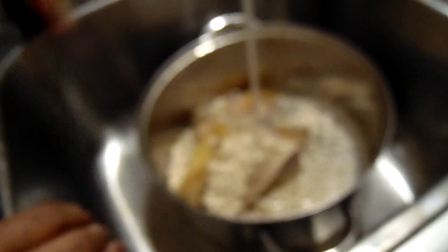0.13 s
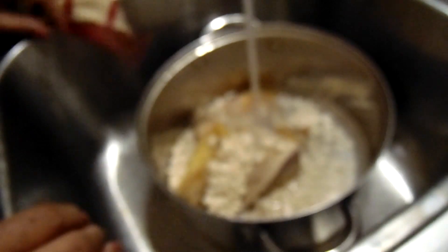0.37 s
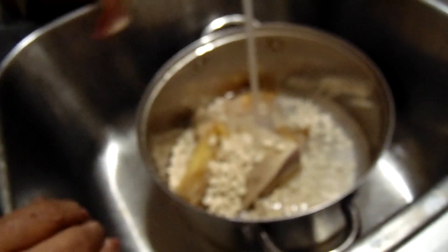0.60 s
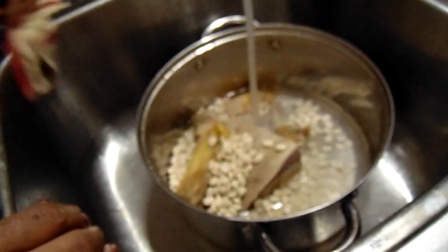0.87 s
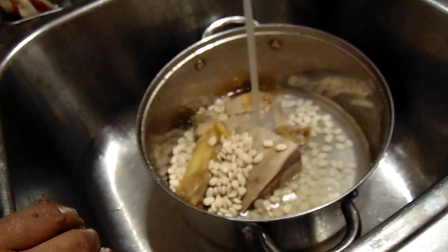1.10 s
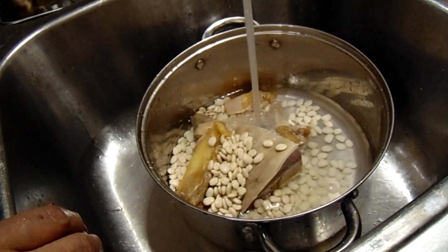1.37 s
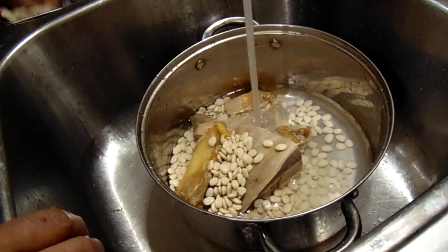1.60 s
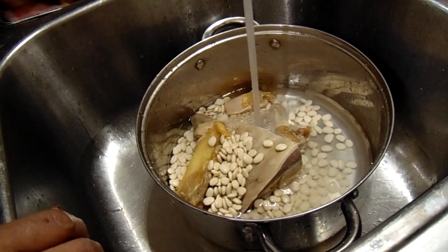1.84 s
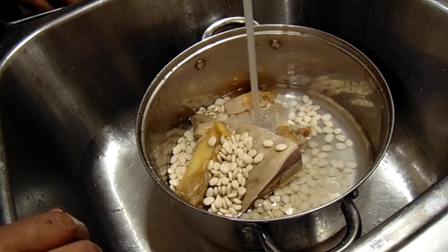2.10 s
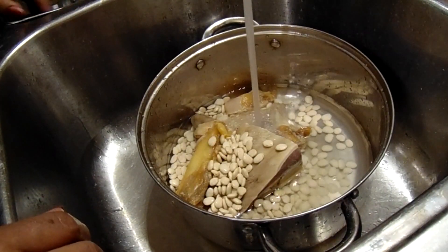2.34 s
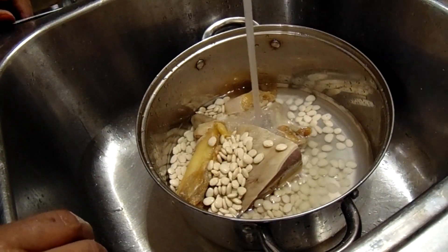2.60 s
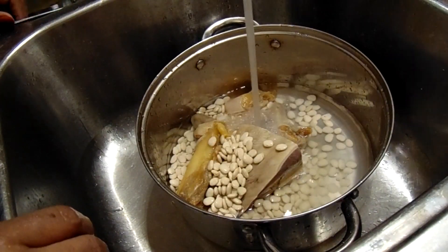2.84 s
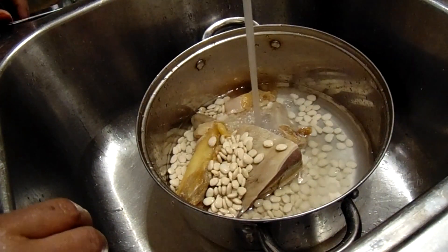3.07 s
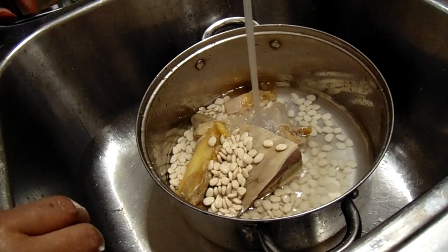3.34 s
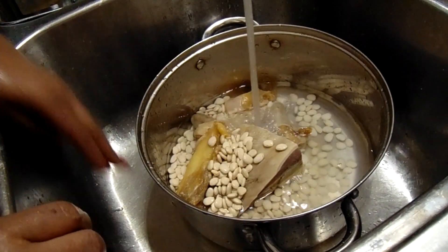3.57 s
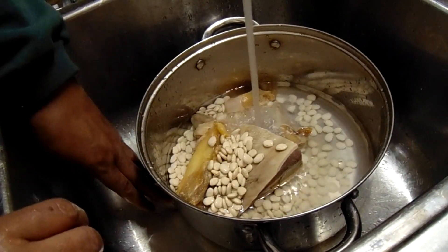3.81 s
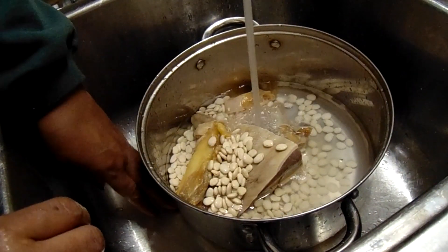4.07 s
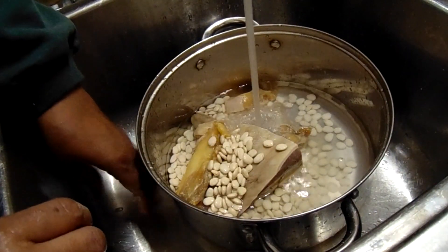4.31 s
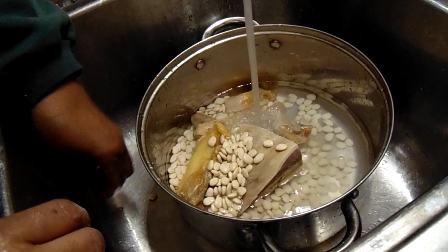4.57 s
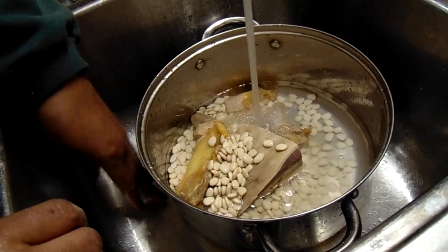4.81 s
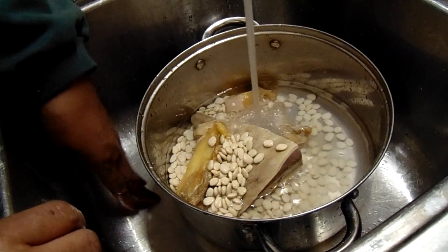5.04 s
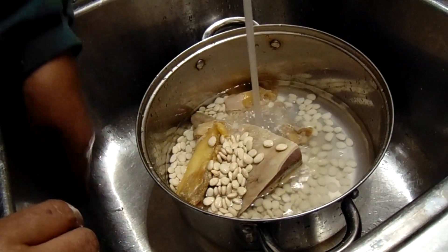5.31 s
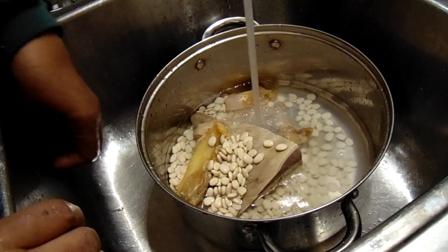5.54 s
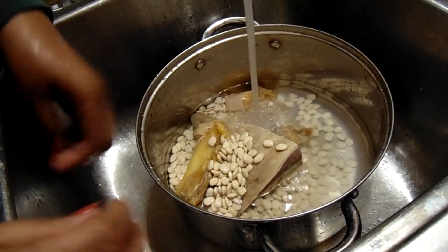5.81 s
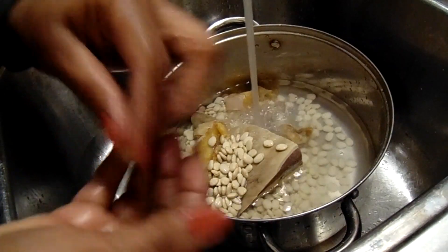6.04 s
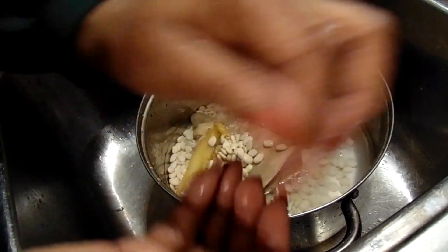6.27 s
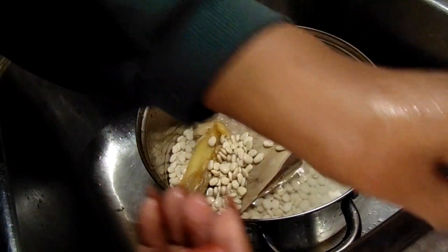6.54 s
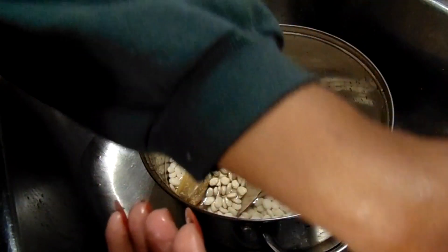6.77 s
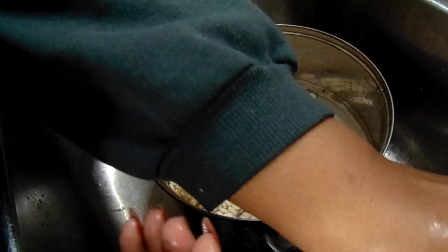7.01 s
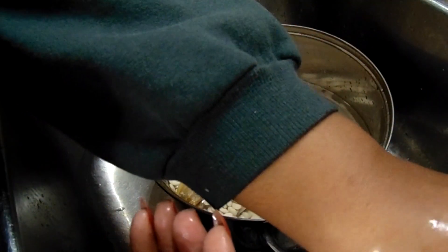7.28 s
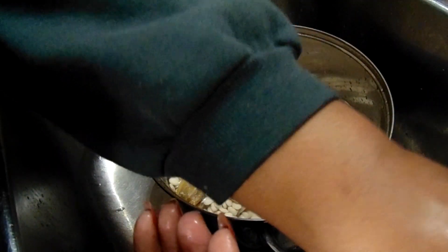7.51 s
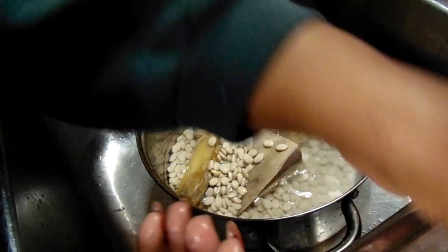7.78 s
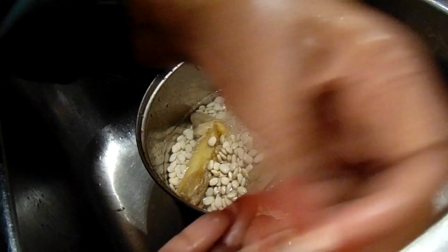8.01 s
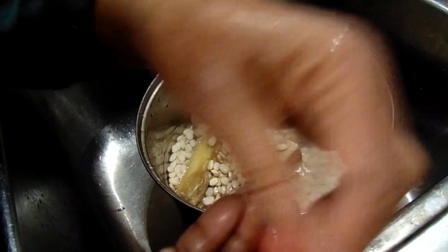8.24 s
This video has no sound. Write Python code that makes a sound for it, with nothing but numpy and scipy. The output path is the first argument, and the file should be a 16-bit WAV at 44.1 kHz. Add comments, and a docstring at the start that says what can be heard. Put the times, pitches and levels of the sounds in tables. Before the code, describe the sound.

Water is already running from a kitchen tap into a steel pot of beans standing in a metal sink, heard close in mono. The continuous rush is bright and hissy, with a thin high mesh whistle, a shimmer of pot resonances, faint low pipe rumble and barely audible hum. From 0 to 2 s, droplets spit irregularly and soft hand touches knock and rub the sink, clearest around 0.8 s, with a short hollow ring. The jet swells until about 4.5 s, becoming fuller and frothier; sharp ticks snap near 0.7 and 2.8 s. From roughly 3.8 s low, round bubbles glug under the stream, one prominent at 5 s, and they continue to the end. Dull bumps land at 5.6-5.8 s. Very brief dropouts dip everything but the highest hiss throughout, deeper near 1.2, 4.9 and 6.3 s. The water still runs at 8.4 s.

```python
"""Water rushes, hisses and spits from a kitchen tap into a steel pot in a steel sink, close to a mono microphone.
Bubbles glug, hands knock the sink, and now and then the recorded sound drops out for a moment.
Shaped noise makes the jet, the gurgling air and the rumble of the pipes; fading tones make the bubbles,
a steady tone the hum. Random shaking rings the pot, short noise bursts make the sprays, soft touches ring the sink."""
import sys
import numpy as np
from scipy import signal
from scipy.fft import rfft, irfft
from scipy.io import wavfile
from scipy.ndimage import uniform_filter1d

SR = 44100
rng = np.random.default_rng(int(sys.argv[2]) if len(sys.argv) > 2 else 0)


def invert_db(level):
    """Linear amplitude ratio for a level in decibels (20 dB per decade), elementwise."""
    return 10 ** (np.asarray(level, dtype=float) / 20)


def bounce(signal):
    """Save signal as a 16-bit WAV file at the path given by the first command-line argument."""
    frames = np.transpose(np.atleast_2d(signal))
    limited = np.clip(frames, -1, 1)
    pcm = np.round(limited * 32767).astype(np.int16)
    wavfile.write(sys.argv[1], SR, pcm)


N = 369558  # length in samples

# How deep the jet plunges. Each row: time in seconds, depth from 0 to 1.
FILL_DEPTH = [(0, 0.06), (.6, 0.38), (1.3, 0.61), (2.5, 0.48), (4, 0.75), (6, 0.76), (8.4, 0.95)]
# Colour of the jet on bare beans. Each row: frequency in Hz, relative level in dB per Hz.
SHALLOW_COLOUR = [(240, -45), (400, -15), (460, -19), (530, -2), (1280, -9), (1480, -8.5), (2160, -2.5),
                  (2940, -6), (3530, -5), (6740, -9.5), (8810, -6.5), (11500, -7.5), (15000, -19),
                  (22000, -120)]
# Colour of the jet in standing water. Each row: frequency in Hz, relative level in dB per Hz.
DEEP_COLOUR = [(240, -13.5), (400, -3), (537, -6.5), (654, -10.5), (1120, -4), (1400, -8), (1560, 0),
               (1770, -12), (2490, -8), (2860, -7.5), (6460, -9), (11500, -2.5), (15000, -21.5),
               (22000, -120)]
# Rings of the pot that the splash keeps sounding. Each row: frequency in Hz, width in Hz,
# relative level in dB while the water is shallow, relative level in dB once it is deep.
POT_RINGS = [(1030, 90, -4, 2), (1131, 49, -4, -1.5), (1557, 52, -5, 4.5), (2055, 83, -6.5, 5),
             (2460, 66, 2.5, 4), (2622, 60, 9.5, -3.5), (3030, 35, 5.5, -1.5), (3228, 50, 1.5, 0),
             (3910, 80, -9, 2), (5216, 470, -3.5, 7.5), (5990, 19, 4, -8), (7520, 66, 2.5, 2),
             (8490, 130, -8, 3), (9490, 330, 5.5, 10), (10640, 230, -2, 2.5)]
# Colour of the air space of the pot. Each row: frequency in Hz, relative level in dB per Hz.
GURGLE_COLOUR = [(120, -14.5), (200, -11.5), (250, -5), (285, 5.5), (325, 6.5), (370, -10.5), (450, -7.5),
                 (535, -9), (620, -12.5), (800, -18)]
# Colour of the hiss. Each row: frequency in Hz, relative level in dB per Hz.
HISS_COLOUR = [(6000, -41.5), (9000, -18.5), (11500, -38), (12000, -7.5), (14500, -8)]
# Whistles of the aerator mesh. Each row: frequency in Hz, width in Hz, level in dB above the hiss.
MESH_WHISTLES = [(11985, 30, 4), (12120, 22, 4), (12241, 16, 8), (12315, 22, 5), (12645, 60, 3),
                 (13785, 60, 4), (14000, 100, 2)]
# Colour of the pipes and the sink. Each row: frequency in Hz, relative level in dB per Hz.
RUMBLE_COLOUR = [(13, -40), (22, -8), (124, -4), (178, -11.5), (230, 0.5), (300, -15), (510, -120)]
# The loudest sprays of droplets, bright off the jet or dull among the beans.
# Each row: start in seconds, rms level in dB before the burst is shaped, centre in Hz.
LOUD_SPRAYS = [(0.021, -26.5, 3180), (0.12, -33, 8300), (0.17, -31.5, 9090), (0.358, -29.5, 6660),
               (0.583, -28, 10200), (0.64, -36, 1520), (0.657, -22.5, 8000), (0.711, -25.5, 8150),
               (0.7133, -32, 2600), (0.7881, -22, 11500), (0.99, -32, 3030), (1.6, -26.5, 8450),
               (1.602, -34, 2580), (1.7419, -28, 9200), (1.778, -28, 5200), (1.943, -29.5, 5400),
               (2.001, -30.5, 2950), (2.196, -25.5, 10700), (2.196, -31, 4090), (2.233, -26.5, 10200),
               (2.464, -20, 11500), (2.85, -27, 11500), (2.932, -22.5, 8900), (3.29, -29.5, 11000),
               (3.314, -31.5, 2440), (3.3513, -35, 2560), (3.412, -26.5, 8560), (3.76, -25.5, 11600),
               (3.77, -28.5, 3970), (3.8, -39, 1500), (3.852, -25.5, 10500), (3.8871, -25, 8600),
               (3.954, -26, 8800), (3.954, -30, 1970), (4.1011, -29.5, 1440), (4.1275, -30.5, 4580),
               (4.327, -23, 8650), (4.519, -25.5, 5930), (4.595, -26, 11100), (4.845, -28.5, 2260),
               (4.8494, -29.5, 5990), (5.0315, -30, 3060), (5.07, -30, 4240), (5.11, -26.5, 8400),
               (5.303, -20, 10400), (5.565, -27.5, 2670), (5.574, -25, 10700), (5.615, -35, 2520),
               (5.656, -32, 1480), (5.716, -23, 6200), (5.764, -33, 3220), (6.21, -28, 8560),
               (6.3599, -27, 8590), (6.365, -33, 2410), (6.422, -29, 2460), (6.428, -32, 3260),
               (6.634, -30.5, 3710), (6.6393, -29.5, 9950), (6.754, -31, 9410), (6.918, -32, 2050),
               (6.9376, -26.5, 10000), (6.997, -29, 2500), (7.004, -26, 7640), (7.365, -31, 8560),
               (7.838, -23, 10500), (7.8825, -27, 9350)]
# Hands bumping and rubbing the sink. Each row: start in seconds, peak level in dB, length of the touch
# in seconds, hardness as the top frequency in Hz, dull thud in dB over the ring.
HAND_KNOCKS = [(0.452, -39.5, 0.11, 180, -26), (.796, -22, 0.02, 420, -2), (0.829, -32, 0.059, 503, 2),
               (1.171, -38, 0.05, 250, -3), (1.351, -32, 0.048, 400, 5), (1.544, -28.5, 0.047, 352, 0),
               (1.929, -31, 0.086, 345, -3), (5.612, -26, 0.042, 510, 31), (5.786, -31, 0.014, 300, 12),
               (5.82, -35, 0.043, 300, 15)]
# Ringing of the sink's panels. Each row: frequency in Hz, relative level in dB, time to fade by 60 dB in seconds.
SINK_RINGS = [(127, -17, 0.27), (139.5, 2, 0.55), (230, 9.5, 0.053), (278, -10, 0.13), (342.5, -5, 0.54),
              (367, -3, 0.43), (515, -8, 0.26)]
# Air pockets bursting with a sharp tick. Each row: start in seconds, peak level in dB, pitch in Hz.
AIR_TICKS = [(0.657, -11, 8760), (0.7888, -15, 12300), (1.0899, -20, 12300), (2.8446, -8, 11550),
             (2.8453, -9, 13600), (4.8496, -16.5, 5990), (5.3078, -25, 12660), (5.5757, -17, 12300),
             (5.7198, -17, 12300), (7.8394, -22, 12200), (7.8624, -19, 12200), (7.8825, -19, 11900)]
# The loudest large bubbles under the jet. Each row: start in seconds, level in dB before fading, starting pitch in Hz.
LARGE_BUBBLES = [(2.491, -31, 1090), (2.902, -31, 1030), (3.768, -25.5, 308), (3.807, -32, 1030),
                 (3.93, -30, 1990), (4.099, -27.5, 534), (4.27, -32, 1116), (4.358, -24.5, 511),
                 (4.518, -33, 1150), (4.571, -30, 440), (4.601, -28, 274), (4.781, -32, 1045),
                 (4.846, -29, 1103), (4.878, -28, 294), (4.895, -27.5, 436), (4.946, -30, 303),
                 (4.975, -18, 531), (5.119, -25, 282), (5.292, -32, 1030), (5.383, -32, 1030),
                 (5.58, -25, 320), (5.647, -28, 1030), (5.818, -25.5, 278), (6.204, -33, 295),
                 (6.628, -29, 857), (6.658, -26.5, 292), (6.735, -29.5, 980), (6.78, -29, 298),
                 (6.936, -28.5, 316), (7.054, -27.5, 292), (7.375, -25, 280), (7.519, -24, 293),
                 (7.554, -26.5, 304), (7.808, -26.5, 330), (7.837, -26, 290), (7.89, -25.5, 278),
                 (7.981, -24, 306), (8.04, -29.5, 413)]
# Brief dropouts of the recorded sound. Each row: middle in seconds, nominal length in milliseconds.
DROPOUTS = [(.07, 12), (.112, 10), (.199, 14), (.56, 15), (.628, 18), (.965, 12), (1.191, 34), (1.99, 11),
            (2.478, 16), (3.846, 10), (4.337, 10), (4.507, 9), (4.551, 9), (4.699, 11), (4.87, 8),
            (4.923, 31), (5.361, 11), (5.745, 9), (6.192, 10), (6.289, 31), (6.663, 9), (6.705, 12),
            (6.747, 10), (6.854, 10), (7.047, 10), (7.388, 10), (7.537, 10), (7.644, 11), (7.686, 10),
            (8.071, 10), (8.22, 9), (8.348, 10)]

# Every layer of the jet swells while the water rises over the beans, then holds: dB at the start, dB once settled.
SPLASH_DB, GURGLE_DB, HISS_DB = (-37, -34), (-48, -45), (-32, -25.5)
SETTLE_S = 4.54
POT_DB, BUBBLES_DB, FROTH_DB = -17, -17, -14.5  # relative to the splash
WANDER = 0.009  # typical share of their pitch by which the rings drift as the water sloshes
RUMBLE_DB = -56
HUM_HZ, HUM_DB = 60, -61
SPRAY_S, SPRAY_RISE_S = 0.012, 0.0016  # time scales of the fall and the rise
SMALL_SPRAYS = 40  # how many
SMALL_SPRAY_DB, SMALL_SPRAY_HZ = (-42, -35), (1450, 11000)  # ranges of level and centre
BRIEF_S = 0.018  # touches well below this land as a clean blow
GLUG_T60_S = 0.084  # time to fade by 60 dB
DROPOUT_DB_PER_MS, DROPOUT_FLOOR_DB = -2.3, -36  # a longer dropout sinks deeper, down to a floor
DROPOUT_TOP_HZ = 11750  # sound above this keeps on in a dropout
EDGE_HZ = 14270  # upper band limit of the microphone


def read(points, hz):
    """Reads a spectrum on a log-frequency axis."""
    f, value = np.transpose(points)
    return np.interp(np.log(hz + 1), np.log(f + 1), value)


def evened(x):
    """Scales to rms 1."""
    return x / np.sqrt(np.mean(x ** 2) + 1e-20)


def add(mix, s, sound):
    """Mixes a sound in at s seconds."""
    part = mix[round(s * SR):][:len(sound)]
    part += sound[:len(part)]


def band(x, lo_hz, hi_hz):
    """Keeps only the pitches between two limits."""
    return signal.sosfilt(signal.butter(2, [lo_hz, hi_hz], "band", fs=SR, output="sos"), x)


def depth():
    """How deep the jet plunges, sample by sample."""
    return np.interp(np.arange(N) / SR, *np.transpose(FILL_DEPTH))


def swell(start_db, settled_db):
    """Gain of a layer of the jet, sample by sample."""
    return invert_db(np.interp(np.arange(N) / SR, [0, SETTLE_S], [start_db, settled_db]))


def rush(spectrum, rings, patchy_db, surge_db):
    """Rushing noise with resonances, drifting loud patches, and surges shared by all pitches."""
    frames = N // 128 + 5
    real, imaginary, patches = rng.standard_normal((frames, 257, 3)).T
    patches = uniform_filter1d(patches, size=10, axis=0)  # blur over pitch
    patches = evened(uniform_filter1d(patches, size=12, axis=1))  # blur over time
    surge = evened(uniform_filter1d(rng.standard_normal(frames), size=10))
    z = (real + 1j * imaginary) * invert_db(patchy_db * patches + surge_db * surge)
    x = signal.istft(z, nperseg=512, noverlap=384)[1][:N]
    hz = np.fft.rfftfreq(N, 1 / SR)
    lift = 1 + sum((invert_db(db) - 1) / (1 + (2 * (hz - f) / width) ** 2) for f, width, db in rings)
    return irfft(rfft(x) * invert_db(read(spectrum, hz)) * lift, N)


def splash():
    """The jet churning the water; its colour leans to the deep one as the jet plunges deeper."""
    deep = depth()
    shallow = evened(rush(SHALLOW_COLOUR, [], patchy_db=3.0, surge_db=1.5))
    plunging = evened(rush(DEEP_COLOUR, [], patchy_db=2.5, surge_db=1.4))
    return swell(*SPLASH_DB) * (np.sqrt(1 - deep) * shallow + np.sqrt(deep) * plunging)


def pot():
    """Each ring of the pot wall is shaken by its own fitful share of the turbulence and drifts with the sloshing."""
    deep, out = depth(), np.zeros(N)
    for hz, width, shallow_db, deep_db in POT_RINGS:
        real, imaginary, fits = rng.standard_normal((3, N))
        drift = np.interp(np.arange(N), np.linspace(0, N, num=60), WANDER * fits[:60])
        fitful = invert_db(3.3 * evened(uniform_filter1d(fits, size=2200)))
        shake = (real + 1j * imaginary) * fitful
        r = np.exp(-np.pi * width / SR)  # a narrower ring remembers its shaking for longer
        slow = signal.lfilter([1 - r], [1, -r], shake)
        ring = slow * np.exp(2j * np.pi * hz * np.cumsum(1 + drift) / SR)
        out += invert_db(shallow_db + deep * (deep_db - shallow_db)) * evened(ring.real)
    return swell(*SPLASH_DB) * invert_db(POT_DB) * out


def gurgle():
    """Lumpy low noise in the air space above the water."""
    return swell(*GURGLE_DB) * evened(rush(GURGLE_COLOUR, [], patchy_db=0.0, surge_db=2.0))


def hiss():
    """Water forced through the aerator mesh, which also whistles."""
    return swell(*HISS_DB) * evened(rush(HISS_COLOUR, MESH_WHISTLES, patchy_db=-1.1, surge_db=0.3))


def bubble(hz, t60, rise):
    """A damped tone that climbs as the bubble nears the surface."""
    t = np.arange(round(t60 * SR) + 8) / SR
    tone = np.sin(2 * np.pi * hz * t * (1 + rise * t / t60))
    return tone * invert_db(-60 * t / t60) * (1 - np.exp(-t * hz * 0.65))


def fizz(lo_hz, hi_hz, cycles, per_s, spread_db, count):
    """Countless small bubbles of many sizes, arriving in clumps; a few are loud."""
    clumps = invert_db(3.5 * evened(uniform_filter1d(rng.standard_normal(N), size=1500)))
    out = np.zeros(N)
    for hz in np.geomspace(lo_hz, hi_hz, count):
        born = rng.random(N) < per_s / count / SR * clumps
        loudness = invert_db(spread_db * np.minimum(rng.exponential(1, N), 4))
        out += signal.oaconvolve(born * loudness, bubble(hz, cycles / hz, rise=0.2))[:N]
    return evened(out)


def small_bubbles():
    """Small bubbles fizzing under the splash."""
    bubbles = fizz(420, 4600, cycles=18, per_s=400, spread_db=6.0, count=24)
    return swell(*SPLASH_DB) * invert_db(BUBBLES_DB) * bubbles


def froth():
    """Still smaller bubbles, so higher and shorter."""
    bubbles = fizz(5500, 11000, cycles=6.3, per_s=620, spread_db=6.0, count=16)
    return swell(*SPLASH_DB) * invert_db(FROTH_DB) * bubbles


def rumble():
    """Low drone of the pipes and the sink."""
    return invert_db(RUMBLE_DB) * evened(rush(RUMBLE_COLOUR, [], patchy_db=1.9, surge_db=-2.2))


def hum():
    """A faint steady low tone."""
    return invert_db(HUM_DB) * np.sin(2 * np.pi * HUM_HZ * np.arange(N) / SR)


def scattered(count, db_range, hz_range):
    """Rows of start in seconds, dB and Hz for small events at random moments, levels and pitches."""
    when, loud, pitch = rng.random((count, 3)).T
    db = np.interp(loud, [0, 1], db_range)
    hz = hz_range[0] * (hz_range[1] / hz_range[0]) ** pitch
    return list(zip(when * N / SR, db, hz))


def sprays():
    """Short sprays of droplets, each a burst of noise around one pitch."""
    out, t = np.zeros(N), np.arange(4000) / SR
    rows = LOUD_SPRAYS + scattered(SMALL_SPRAYS, SMALL_SPRAY_DB, SMALL_SPRAY_HZ)
    shape = np.exp(-(t / SPRAY_S) ** 2) * (1 - np.exp(-t / SPRAY_RISE_S))
    for (s, db, hz), noise in zip(rows, rng.standard_normal((len(rows), 4000))):
        droplets = evened(band(noise, hz * 0.74, min(hz * 1.48, SR / 2.2)))
        add(out, s, invert_db(db) * shape * droplets)
    return out


def knocks():
    """A touch of skin, a clean blow when brief and a rough rub when long, thuds and rings the sink's panels."""
    out, t = np.zeros(N), np.arange(SR // 2) / SR
    ring = sum(invert_db(db - 60 * t / t60) * np.sin(2 * np.pi * hz * t) for hz, db, t60 in SINK_RINGS)
    noises = rng.standard_normal((len(HAND_KNOCKS), SR // 2))
    for (s, db, length, hz, thud_db), noise in zip(HAND_KNOCKS, noises):
        rub = evened(noise * t / length * np.exp(-3 * t / length))
        blow = evened(t == 0)  # a single click
        clean = np.exp(-(length / BRIEF_S) ** 2)
        touch = band(clean * blow + (1 - clean) * rub, 94, hz)
        ringing = evened(signal.oaconvolve(ring, touch)[:len(t)])
        sound = ringing + invert_db(thud_db) * evened(touch)
        add(out, s, invert_db(db) * sound / abs(sound).max())
    return out


def ticks():
    """Air pockets burst in about a millisecond, thrown back twice by the pot wall."""
    out, t = np.zeros(N), np.arange(300) / SR
    shape = (1 - np.exp(-t / 0.00045)) * np.exp(-t / 0.00054)
    for s, db, hz in AIR_TICKS:
        burst = invert_db(db) * shape / shape.max() * np.sin(2 * np.pi * hz * t)
        add(out, s, burst)
        for delay, echo_db in [(.0021, -8), (.0075, -15)]:
            add(out, s + delay, invert_db(echo_db) * burst)
    return out


def glugs():
    """Single large bubbles, each one damped, slightly climbing tone."""
    out = np.zeros(N)
    for s, db, hz in LARGE_BUBBLES:
        add(out, s, invert_db(db) * bubble(hz, GLUG_T60_S, rise=.05))
    return out


def scene():
    """All sources, heard from one point."""
    water = splash() + pot() + gurgle() + hiss() + small_bubbles() + froth()
    water += sprays() + ticks() + glugs()
    return np.tile(water + rumble() + hum() + knocks(), (2, 1))


def drop_out(x):
    """Dips the whole sound in each dropout, save for its top and the few partials that stand out most."""
    hz, _, z = signal.stft(x, SR, nperseg=2048, noverlap=1536)
    # a partial stands out when it is well above its neighbours in pitch
    stands_out = abs(z) > invert_db(8.3) * uniform_filter1d(abs(z), size=41, axis=0)
    kept = uniform_filter1d(stands_out * 1., size=3, axis=0) > 0
    is_top = (hz >= DROPOUT_TOP_HZ)[:, None]
    partials = signal.istft(z * kept * ~is_top, SR, nperseg=2048, noverlap=1536)[1][:N]
    top = signal.istft(z * is_top, SR, nperseg=2048, noverlap=1536)[1][:N]
    t, gain = np.arange(N) / SR, np.ones(N)
    for s, ms in DROPOUTS:
        low = invert_db(max(DROPOUT_DB_PER_MS * ms, DROPOUT_FLOOR_DB))
        edge = np.clip((abs(t - s) - ms / 2000 + .005) / .014, 0, 1)  # slopes of 14 ms
        gain = np.minimum(gain, low + (1 - low) * np.sin(np.pi / 2 * edge) ** 2)
    return gain * x + (1 - gain) * (top + invert_db(1.0) * partials)


def low_pass(x):
    """Removes everything above the highest recorded frequency."""
    return signal.sosfilt(signal.butter(12, 15370, fs=SR, output="sos"), x)


def record(dry):
    """The microphone's bass cut and upper band limit, then the dropouts."""
    x = signal.lfilter(*signal.butter(1, 18, "high", fs=SR), dry[0])
    x = signal.oaconvolve(x, signal.firwin(1023, EDGE_HZ, window=("kaiser", 8), fs=SR), "same")
    mix = np.tile(drop_out(x), (2, 1))
    return low_pass(mix)


dry = scene()
out = record(dry)
bounce(out)
```